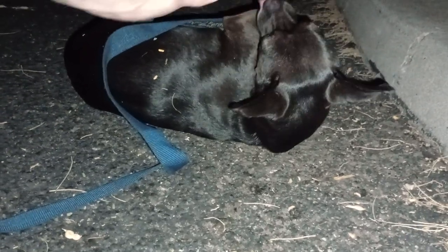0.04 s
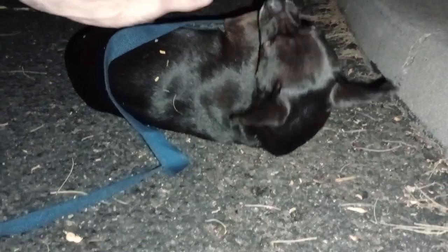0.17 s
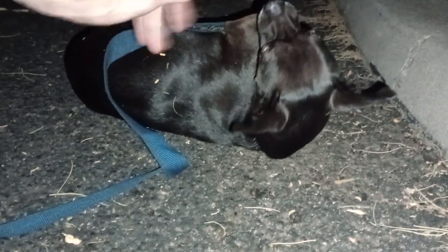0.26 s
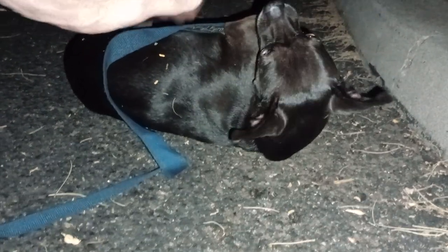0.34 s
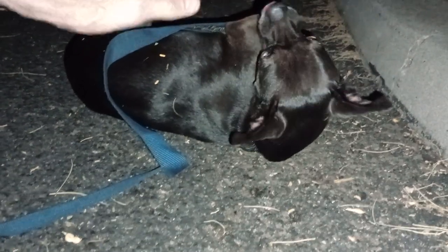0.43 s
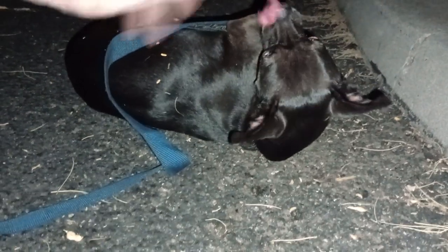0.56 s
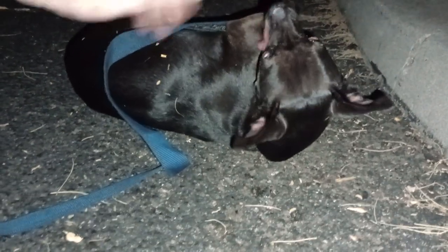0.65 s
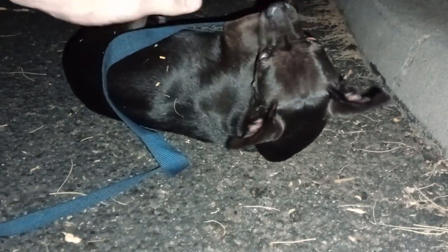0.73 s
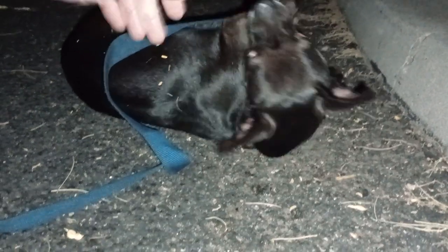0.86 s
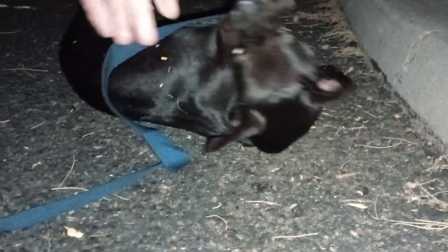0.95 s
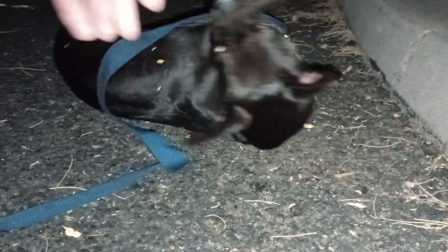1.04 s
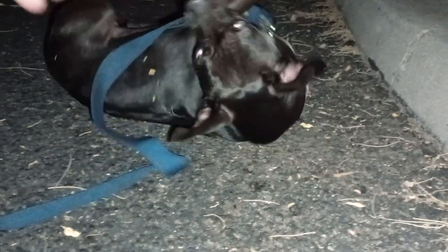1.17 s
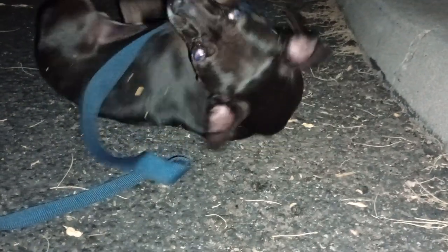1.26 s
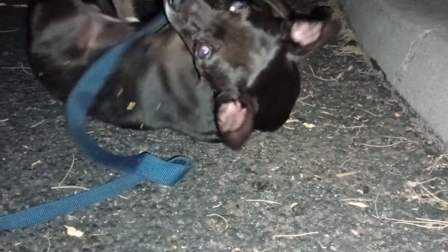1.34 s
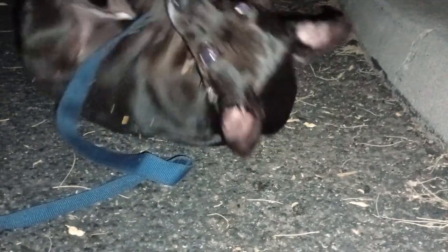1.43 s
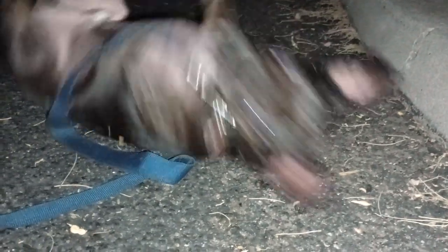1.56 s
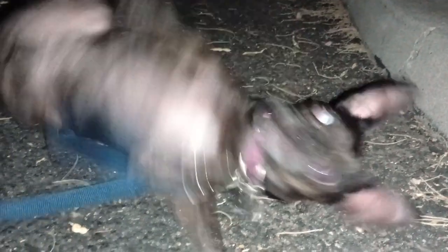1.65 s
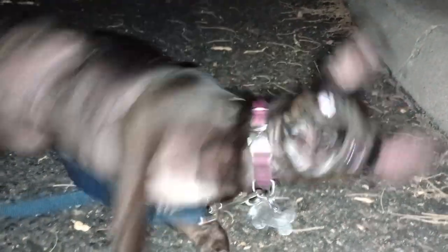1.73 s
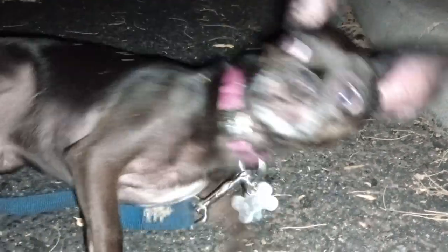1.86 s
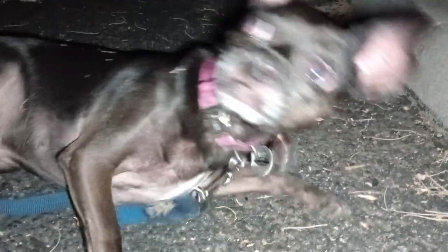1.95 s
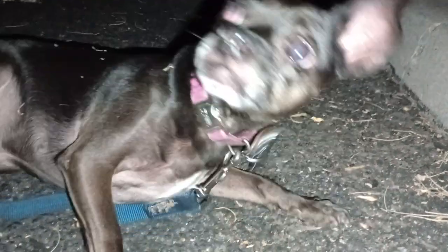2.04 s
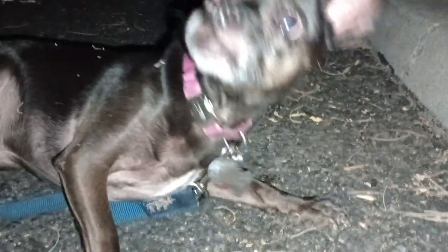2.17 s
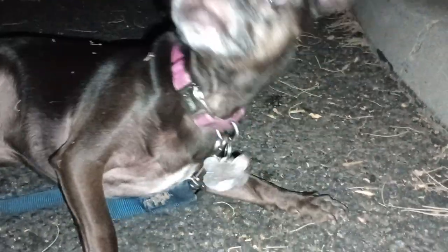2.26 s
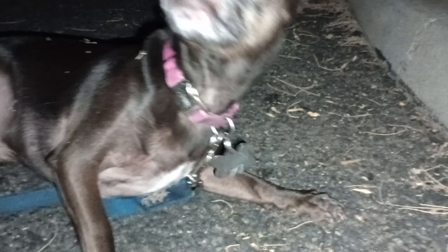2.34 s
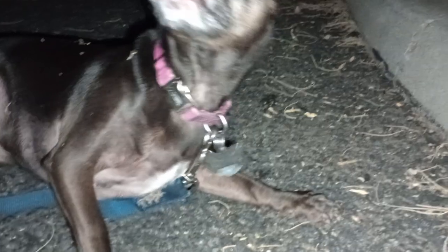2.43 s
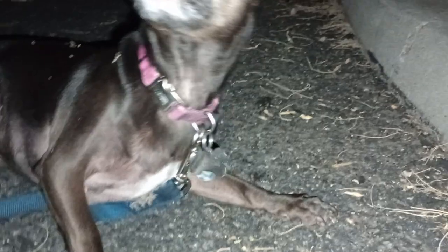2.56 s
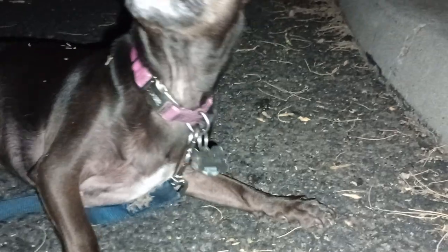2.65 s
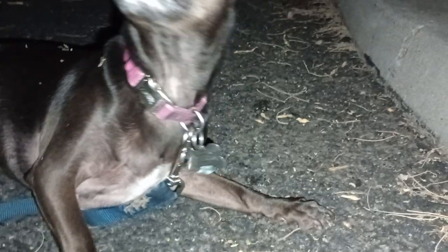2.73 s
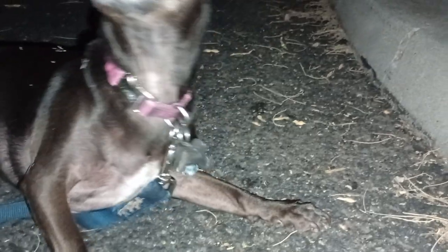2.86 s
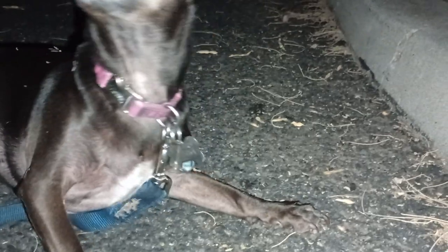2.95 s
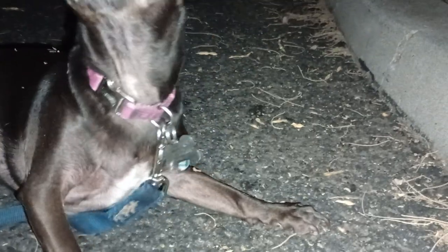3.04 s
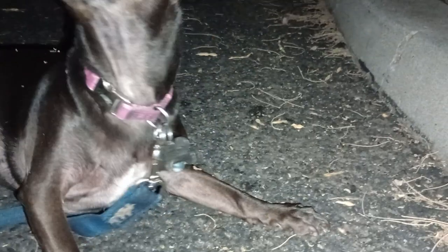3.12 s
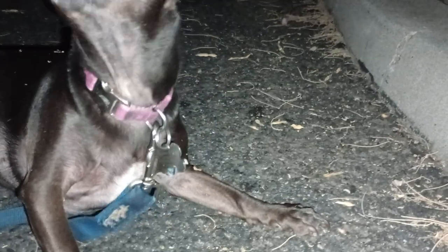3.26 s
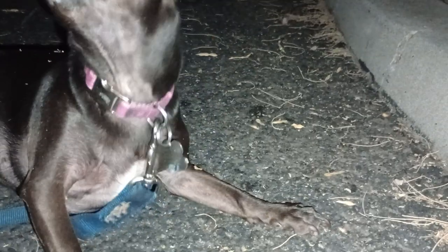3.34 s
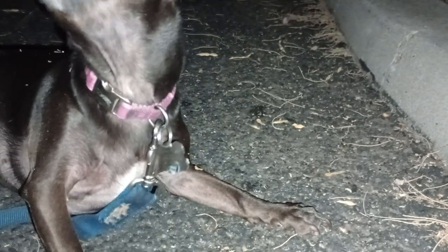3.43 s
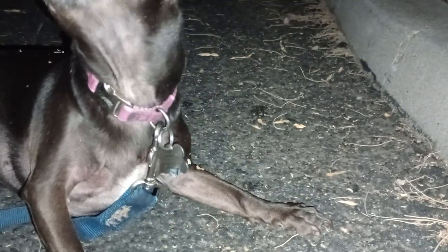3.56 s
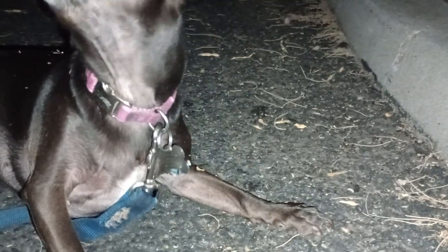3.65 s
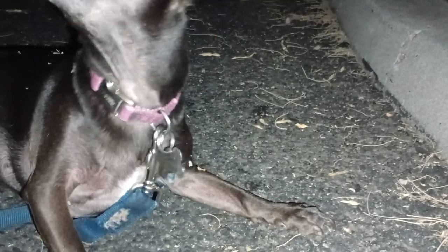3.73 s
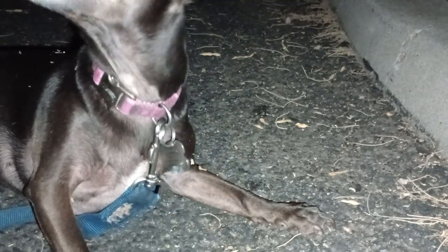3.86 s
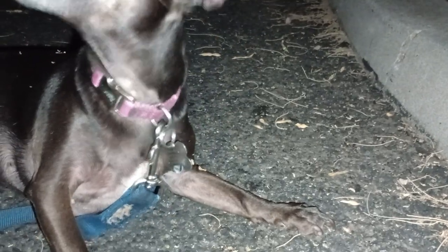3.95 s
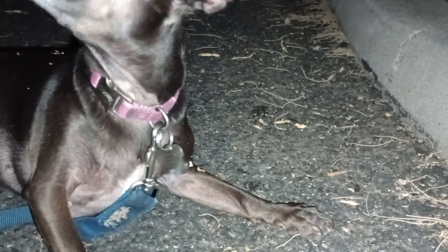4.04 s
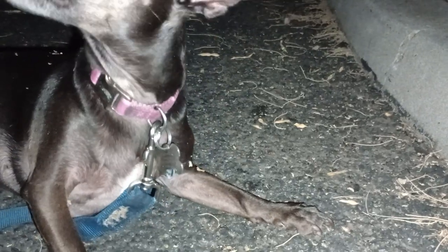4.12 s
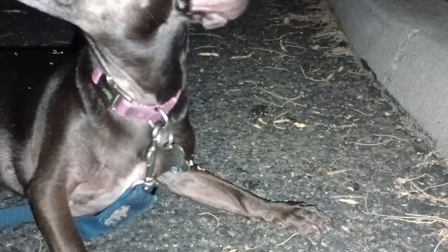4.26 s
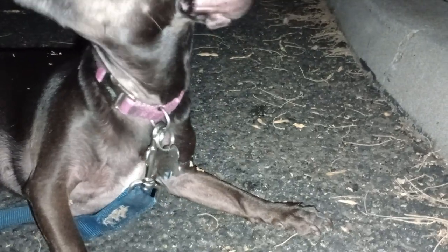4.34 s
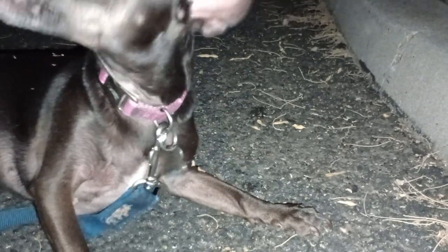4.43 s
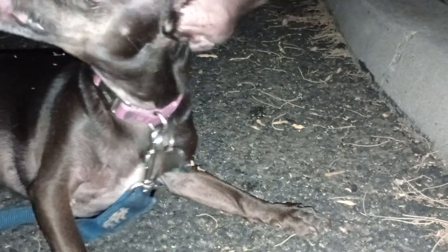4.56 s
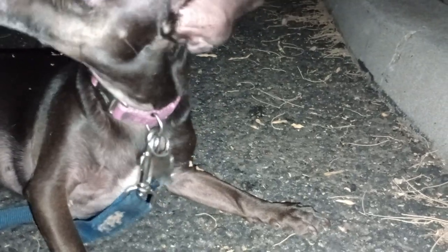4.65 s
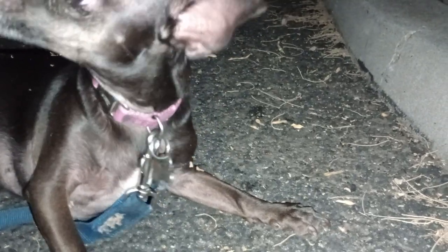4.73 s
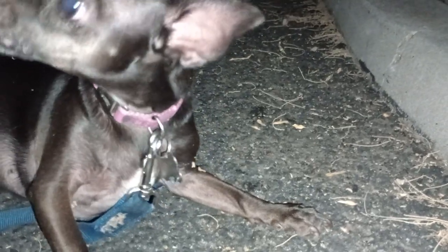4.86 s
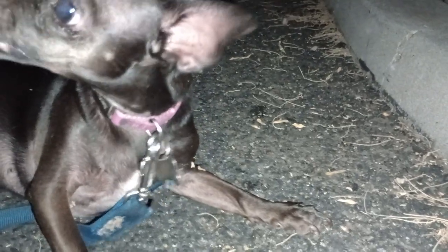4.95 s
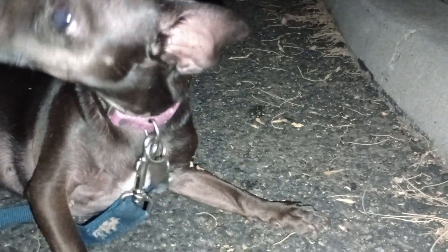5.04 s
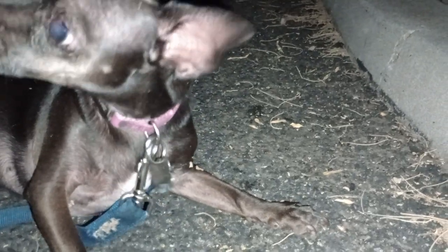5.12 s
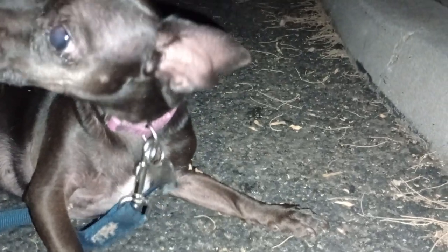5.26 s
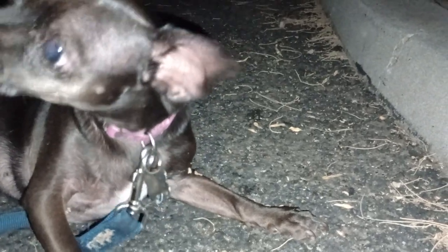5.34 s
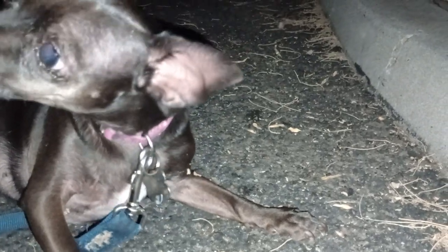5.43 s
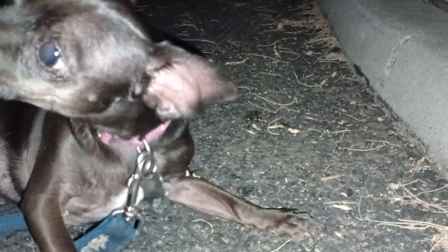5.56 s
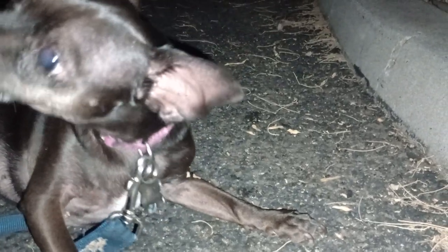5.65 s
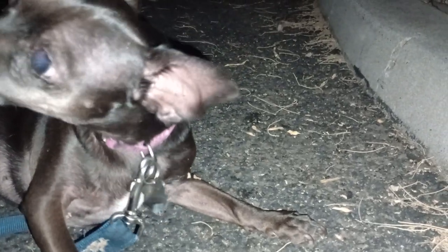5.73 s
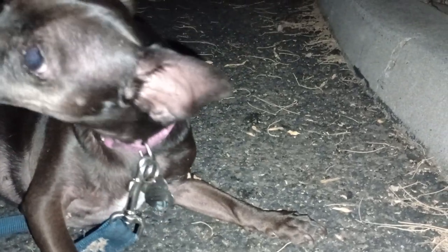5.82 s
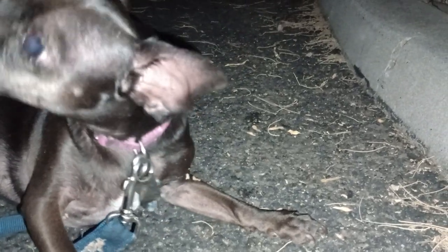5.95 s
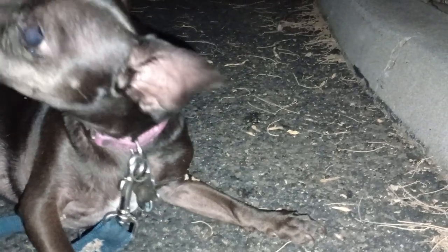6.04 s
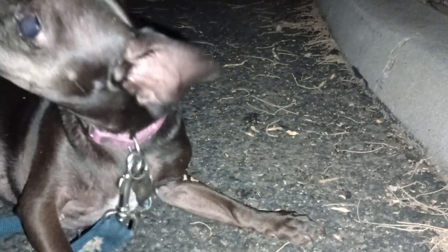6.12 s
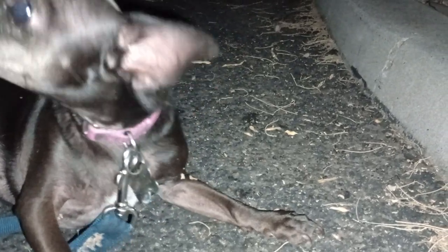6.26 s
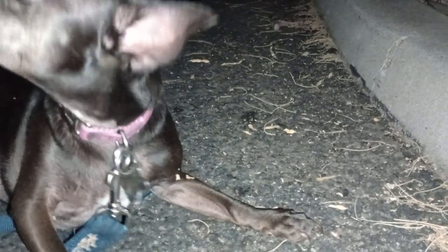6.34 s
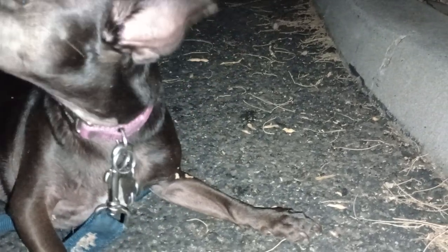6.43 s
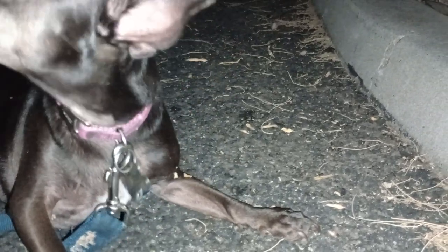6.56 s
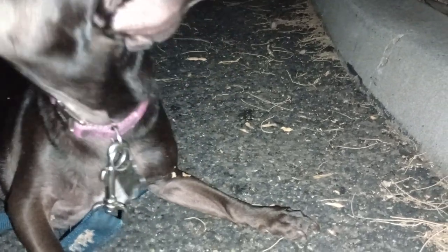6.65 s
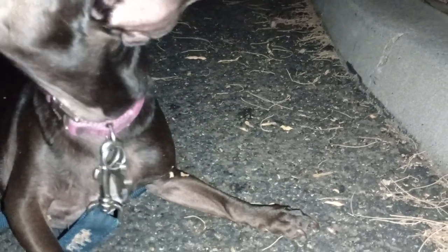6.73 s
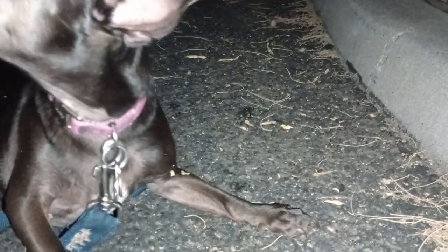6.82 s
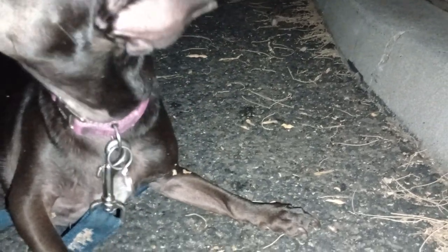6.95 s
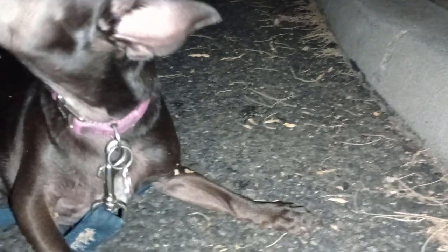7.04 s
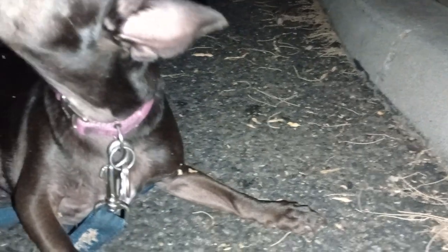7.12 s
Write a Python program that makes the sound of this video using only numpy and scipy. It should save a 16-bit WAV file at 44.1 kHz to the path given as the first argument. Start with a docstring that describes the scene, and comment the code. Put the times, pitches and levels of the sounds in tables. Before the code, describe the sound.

A quiet street at night, heard close up on a phone in stereo. Low distant traffic rumble, soft hiss and a faint wavering hum swell and dip throughout. From 0 to 1.7 s there are only tiny fur and strap rustles and a few faint ticks. At about 1.77 s the dog rolls upright: dull knocks on gritty asphalt and a sudden, loud, bright clatter of collar tags, rings and leash clip. Rapid irregular clashes with very short, high rings are densest until 2.35 s, then thin out by 2.6 s. A faint cricket starts on the right around 2.4 s and continues. A short nasal snort comes at 2.85 s, with a weaker puff just after. Small metallic ticks and strap rubs gather at 3.2 to 3.6 s, then grow sparse. Another little clink and dull knock falls at 6.03 s, followed by faint ticks and rustle to the end near 7.2 s.

```python
"""A small dog's metal tags, rings and leash clip clash in a burst as it rolls upright on gritty asphalt,
close to a phone; fading sine waves make the ringing and short noise bursts make the cracks.
Lone ticks, fur and strap rustle, snorts and dull knocks are shaped noise, with pings in the ticks.
Under it all lie far traffic (filtered noise) and a mains hum (wavering sines), a background whose level
rises and dips; a cricket (pulsed noise) starts up partway."""
import sys
import numpy as np
from scipy import signal
from scipy.fft import rfft, irfft, next_fast_len
from scipy.io import wavfile
from scipy.ndimage import uniform_filter1d

SR = 44100
rng = np.random.default_rng(int(sys.argv[2]) if len(sys.argv) > 2 else 0)


def to_wav(sig):
    """Store sig (one row per channel, or 1-D mono) as 16-bit WAV at the path in sys.argv[1].

    Samples outside -1..1 are clipped; the rate is SR.
    """
    pcm = np.clip(np.atleast_2d(sig), -1, 1) * 32767
    pcm = np.round(pcm).astype(np.int16)
    wavfile.write(sys.argv[1], SR, pcm.T)  # frames by channels


N = 317079
T = np.arange(N) / SR


def undb(db):
    """Turn decibels into a gain."""
    return 10 ** (np.asarray(db) / 20)


def unit(x):
    """Scale a sound to an rms of 1."""
    return x / np.sqrt(np.mean(x ** 2))


def sides(pan_db):
    """Left and right gains that differ by pan_db; positive favours the left."""
    return undb([[pan_db / 2], [-pan_db / 2]])


def shape(x, points):
    """Filter a sound by a curve of (pitch [Hz], gain [dB]) points."""
    hz, db = np.transpose(points)
    size = next_fast_len(N)
    log_hz = np.log(np.fft.rfftfreq(size, 1 / SR) + 1)
    gain = undb(np.interp(log_hz, np.log(hz), db))
    return irfft(rfft(x, size) * gain, size)[:N]


def band(x, lo_hz, hi_hz):
    """Keep mainly the pitches between two limits."""
    edges = [lo_hz, min(hi_hz, .45 * SR)]
    return signal.sosfilt(signal.butter(2, edges, "bandpass", fs=SR, output="sos"), x)


def curves(table, rest_db=-140):
    """Draw each level column of a table over time, at rest_db outside it."""
    s, *columns = np.transpose(table)
    return [np.interp(T, s, c, rest_db, rest_db) for c in columns]


def walk(rate):
    """A smooth random wander with about `rate` new targets a second and a spread near 1."""
    k = int(SR / rate)
    steps = np.repeat(rng.standard_normal(N // k + 1), k)
    return 1.4 * uniform_filter1d(uniform_filter1d(steps, k), k)[:N]


def add(out, s, sound):
    """Mix a sound in at s seconds."""
    i = int(s * SR)
    out[:, i:i + sound.shape[1]] += sound[:, :N - i]


# how alike left and right are in the background: (pitch [Hz], likeness [0 to 1])
LIKENESS = [(60, 0.99), (290, 0.48), (640, 0.15), (1400, 0)]


def pair(points):
    """Noise of a given colour on two sides: alike in the bass, unrelated in the treble."""
    hz, alike = np.transpose(LIKENESS)
    # what both sides share grows with likeness, what sets them apart shrinks
    mid, side = (shape(rng.standard_normal(N), np.transpose([hz, 10 * np.log10(1 + sign * alike)]))
                 for sign in (1, -1))
    return unit(np.array([shape(mid + side, points), shape(mid - side, points)]))


LUMPS_DB, LUMPS_PER_S = 1.5, 9  # spread and pace of each slice's flicker


def lumpy(x, lo_hz, count):
    """Quarter-octave slices from lo_hz upward swell and fade on their own."""
    size = next_fast_len(N)
    spectrum = rfft(x, size)
    place = 4 * np.log2(np.fft.rfftfreq(size, 1 / SR) / lo_hz + 1e-9)
    place = np.clip(place, 0, count - 1)  # the end slices also take everything beyond them
    out = 0
    for k in range(count):
        weight = np.clip(1 - np.abs(place - k), 0, 1)
        out = out + undb(LUMPS_DB * walk(LUMPS_PER_S)) * irfft(spectrum * weight, size)[:, :N]
    return out


# colour of the traffic rumble: (pitch [Hz], relative level [dB per Hz])
RUMBLE_COLOUR = [(12, -63), (20, -38), (80, -8), (114, -1.5), (195, -4), (242, -2), (265, -9), (296, -8),
                 (443, -23), (500, -32.5), (650, -54.5), (1100, -120)]


def rumble(bed_db, throb):
    """Far traffic: deep noise follows the background level, throbs as a whole and flickers in slices."""
    return undb(bed_db + 2 + throb) * unit(lumpy(pair(RUMBLE_COLOUR), 61.1, count=12))


# colour of the background hiss: (pitch [Hz], relative level [dB per Hz])
HISS_COLOUR = [(210, -38.5), (350, -8.5), (464, -11.5), (793, -8.5), (1580, -20), (3480, -31.5),
               (5840, -20), (9210, -35.5), (15000, -47.5)]
HISS_UNDER_DB, HISS_SWELL = -8.5, 1.2  # lies under the background level and swells more steeply
FAR_HISS_DB, FAR_HISS_HZ = -89, 1202  # the part above this pitch is steady


def background_hiss(bed_db, throb):
    """Hiss: its lower part rises and falls with the rumble, its upper part stays steady."""
    mean_db = bed_db.mean()
    level_db = HISS_SWELL * (bed_db - mean_db) + mean_db + HISS_UNDER_DB
    bed = pair(HISS_COLOUR) * sides(0.93)
    low = signal.lfilter(*signal.butter(1, FAR_HISS_HZ, fs=SR), bed)
    return undb(level_db + throb) * lumpy(low, 350, count=9) + undb(FAR_HISS_DB) * (bed - low)


# mains hum tones, before they waver: (pitch [Hz], level [dB])
HUM_TONES = [(119, -78.5), (240, -73.5), (296, -82.5)]


def hum(throb):
    """Mains hum: sine tones wander in pitch and level, and share the background's throb."""
    out = 0
    for hz, db in HUM_TONES:
        gain = undb(db + throb + 2.3 * walk(3.9))
        out = out + gain * np.sin(2 * np.pi * np.cumsum(hz + 4.4 * walk(9.6)) / SR)
    return out


# cricket: (time [s], level [dB])
CRICKET_LEVEL = [(2.3, -110), (2.6, -88), (4.5, -93.5), (7.19, -90)]
CRICKET_HZ, CRICKET_PAN_DB = 4684, -19.5  # far to the right
CRICKET_RATE = 94  # average strokes a second


def cricket():
    """A cricket's fast uneven trill: narrow noise pulses once for each stroke."""
    pace = CRICKET_RATE * (1 + .25 * walk(18))
    strokes = 1.2 + np.sin(np.pi * np.cumsum(pace) / SR) ** 2
    chirp = unit(band(strokes * rng.standard_normal(N), CRICKET_HZ - 85, CRICKET_HZ + 85))
    both = np.array([np.roll(chirp, 5), chirp])  # the left hears it 5 samples later
    return undb(curves(CRICKET_LEVEL)[0]) * both * sides(CRICKET_PAN_DB)


# background over time, followed by rumble and low hiss: (time [s], level before offsets and throb [dB])
BED_LEVEL = [(0, -68), (1.2, -70), (1.62, -69), (1.9, -62), (2.3, -72), (2.4, -64.5), (2.78, -67),
             (2.9, -63), (3.06, -72), (3.3, -64), (3.62, -61), (3.78, -66.5), (4.17, -68), (4.24, -64),
             (4.58, -68), (4.68, -72.5), (4.97, -67.5), (5.22, -71.5), (5.33, -62.5), (5.65, -65),
             (5.75, -68), (6.05, -65.5), (6.6, -72), (6.87, -63), (7.11, -68.5), (7.19, -64.5)]
THROB_DB, THROBS_PER_S = 2.6, 10  # spread and pace of the throb shared by rumble, low hiss and hum


def night():
    """The background: rumble and low hiss rise and fall together, hum throbs with them, a cricket joins."""
    bed_db = np.interp(T, *np.transpose(BED_LEVEL))
    throb = THROB_DB * walk(THROBS_PER_S)
    return rumble(bed_db, throb) + background_hiss(bed_db, throb) + hum(throb) + cricket()


SHARED = 0.1365  # share of a noisy contact's power that reaches both ports alike
PORT_LAG = 13  # samples by which the right port is late


def near(envelope):
    """Noise from close by: the left port hears it first, and each port gets reflections of its own."""
    common, left, right = rng.standard_normal((3, len(envelope))) * envelope
    a, b = np.sqrt(SHARED), np.sqrt(1 - SHARED)
    return np.array([a * common + b * left, np.roll(a * common + b * right, PORT_LAG)])


def grit(rate, spread_db, tail_ms):
    """About `rate` random contacts a second of very uneven size, each with a short noisy tail."""
    hits = (rng.random(N) < rate / SR) * undb(spread_db * np.minimum(rng.exponential(size=N), 3))
    power = signal.lfilter([1], [1, -np.exp(-1000 / (tail_ms * SR))], hits ** 2)
    return near(np.sqrt(power + 1e-9))


# fur and strap, one list before the burst and one after:
# (time [s], bright part level [dB], dull part level [dB])
RUSTLE_LEVELS = [
    [(0.0, -101, -91.5), (0.298, -102, -94.5), (0.74, -94.5, -92), (1.43, -106, -94.5), (1.734, -100, -88),
     (1.772, -70, -61)],
    [(2.62, -100, -93), (2.91, -101, -89), (3.51, -93, -88.5), (3.99, -97.5, -89), (4.39, -96, -87.5),
     (4.57, -98.5, -92.5), (5.33, -94.5, -90), (5.48, -97, -90), (5.75, -97, -92.5), (6.67, -101.5, -93),
     (6.97, -92.5, -90.5), (7.19, -95.5, -86.5)],
]


def rustle():
    """Fur and webbing rub: a crowd of tiny contacts makes a fine grainy noise."""
    x, out = grit(2300, 2.1, 1.5), 0
    bright, dull = unit(band(x, 4500, 10000)), unit(band(x, 1400, 4900))
    for table in RUSTLE_LEVELS:
        db, dull_db = curves(table)
        out = out + undb(db) * bright + undb(dull_db) * dull
    return out


# strokes of strap on fur: (time [s], length [s], level [dB], centre pitch [Hz])
STROKES = [(0.094, 0.034, -88.5, 3500), (0.17, 0.09, -85.5, 4180), (0.745, 0.058, -90.5, 3960),
           (0.507, 0.086, -87.5, 5440), (3.188, 0.054, -79, 5070), (3.29, 0.039, -68, 5150),
           (3.489, 0.14, -76.5, 7300), (3.781, 0.035, -81.5, 8900), (4.329, 0.064, -86.5, 8650),
           (4.91, 0.04, -80, 7830), (5.288, 0.086, -83, 5980), (5.35, 0.087, -86.5, 10600),
           (6.682, 0.054, -81, 5940), (6.814, 0.078, -84, 9900), (7.165, 0.032, -78, 11300)]


def rubs():
    """Short strokes of strap on fur: grainy noise that swells and fades."""
    x, out = grit(1400, 3.5, .9), 0
    for s, length, db, hz in STROKES:
        swell = np.exp(-((T - s - length / 2) / (0.63 * length)) ** 4)
        out = out + undb(db) * swell * unit(band(x, hz / 1.9, hz * 1.22))
    return out


# blows through the nose: (time [s], length [s], level before the nose colours it [dB])
SNORT_BLOWS = [(2.846, 0.041, -56.5), (2.932, 0.049, -72)]
# pitches the nose favours: (pitch [Hz], width [Hz], relative level [dB])
NOSE_BANDS = [(1265, 300, 1), (2430, 380, -4), (4400, 4100, 1), (11300, 5000, -8)]


def snorts():
    """The dog blows through its nose: puffs of noise coloured by a few bands."""
    envelope = 0
    for s, length, db in SNORT_BLOWS:
        rise = np.clip((T - s) / 0.0092, 0, 1)
        fall = np.exp(-np.clip((T - s - length) / 0.021, 0, 50))
        envelope = envelope + undb(db) * rise * fall
    blow = near(envelope)
    # the square root evens out the loudness of narrow and wide bands
    return sum(undb(db) * band(blow, hz - width / 2, hz + width / 2) * np.sqrt(SR / width / 20)
               for hz, width, db in NOSE_BANDS)


# knocks on the ground: (time [s], peak level [dB], pitch [Hz], tail's time to fall 60 dB [s])
GROUND_KNOCKS = [(1.7736, -36.5, 826, 0.012), (1.779, -36, 784, 0.06), (1.7867, -48, 970, 0.063),
                 (1.8117, -50, 970, 0.024), (1.8373, -49.5, 1080, 0.048), (1.864, -49.5, 1600, 0.033),
                 (2.017, -48.5, 980, .023), (6.028, -53, 1290, 0.11), (6.0335, -48, 1280, 0.055)]


def thuds():
    """Dull knocks of leg and buckle on the ground: one blow and a gritty tail."""
    out, t = np.zeros((2, N)), np.arange(4096) / SR
    for s, db, hz, t60 in GROUND_KNOCKS:
        tail = 0.19 * rng.standard_normal(len(t)) * np.exp(-np.log(1000) * t / t60)
        knock = band(np.exp(-(t / 0.00016) ** 2) + tail, hz / 1.515, hz * 1.24)
        add(out, s, np.array([knock, np.roll(knock, 5)]) * undb(db) / np.abs(knock).max())
    return out


FAINT_PER_S, FAINT_DB = 14, 20  # ticks a second, level over the rustle's bright part
FAINT_HZ, FAINT_DULL_DB = 7520, -37  # middle pitch, dull part relative to the click


def faint():
    """Rows for small ticks at random times that rise and fall with the rustle."""
    s = rng.random(int(FAINT_PER_S * N / SR)) * T[-1]
    hz = np.clip(FAINT_HZ * np.exp(0.3 * rng.standard_normal(len(s))), 3000, 15000)
    rustle_db = np.max([curves(table)[0] for table in RUSTLE_LEVELS], axis=0)
    db = np.interp(s, T, rustle_db) + FAINT_DB
    return list(zip(s, db, hz, np.full_like(s, FAINT_DULL_DB)))


# ticks of metal and grit: (time [s], level [dB], centre pitch [Hz], dull part relative level [dB])
TICK_HITS = [(0.123, -58, 7400, -23), (0.506, -68, 6460, -27), (0.5303, -65, 6160, -27),
             (0.5732, -56, 9000, -35), (2.977, -60, 9400, -4.5), (3.216, -58.5, 5130, -18),
             (3.292, -55.5, 5470, -39), (3.3057, -37.5, 8260, -29), (3.314, -44, 14100, -27),
             (3.431, -46.5, 9840, -42), (3.455, -58, 5260, -23), (3.495, -45, 9700, -42),
             (3.5591, -39.5, 7660, -11.5), (3.56, -34.5, 15500, -38), (3.6224, -60.5, 3300, -18),
             (3.7835, -65, 5670, -28.5), (3.9647, -69, 3600, -15.5), (4.11, -69, 3700, -21.5),
             (4.13, -74, 3150, -18), (4.201, -51, 5480, -35), (4.208, -58, 1790, -33.5),
             (4.414, -65, 5680, -24), (4.569, -68.5, 4560, -4), (4.736, -74, 3520, -16),
             (4.8985, -70, 5510, -4), (4.9244, -61, 10500, -31.5), (5.2817, -59, 5670, -36.5),
             (5.3, -70, 7070, -30), (5.347, -75, 8800, -29.5), (5.609, -63.5, 11170, -30),
             (5.617, -68, 10800, 2.5), (6.0194, -44, 8050, 1), (6.0225, -38.5, 14240, -9),
             (6.0249, -40, 10270, 1), (6.0324, -44, 6100, 2.5), (6.049, -64, 9700, -15),
             (6.068, -59.5, 6450, -6.5), (6.68, -81, 12000, -30.5), (6.7003, -62, 5040, -5),
             (6.823, -60, 5400, -20), (6.823, -62, 9500, -30.5), (7.014, -61, 12880, -32),
             (7.0673, -61, 9750, -10), (7.106, -58.5, 4670, -3.5), (7.158, -63.5, 7370, -29)]
# the collar moves: (time [s], left minus right [dB])
COLLAR_PAN = [(0, -5), (3.35, -7), (3.45, -1.5), (3.9, 2.5), (5.3, 23), (6.0, -0.5), (7.0, 12.5)]


def ticks():
    """Short grainy clicks, each a noise burst with its own colour and a brief ping."""
    out, t = np.zeros((2, N)), np.arange(2048) / SR
    for s, db, hz, dull_db in TICK_HITS + faint():
        burst = near((np.exp(-t / .0018) + .06 * np.exp(-t / .008)) * np.minimum(t / .0005, 1))
        body = band(band(burst, hz / 1.35, hz * 1.3), hz / 1.35, hz * 1.3)
        ping = 3.0 * band(burst, hz / 1.03, hz * 1.03)
        click = body + 0.43 * band(burst, 3460, 10400) + ping
        dull = band(band(burst, 1720, 4900), 1720, 4900)
        both = click / np.abs(click).max() + undb(dull_db) * dull / np.abs(dull).max()
        add(out, s, undb(db) * both * sides(np.interp(s, *np.transpose(COLLAR_PAN))))
    return out


# loose metal between the clashes: (time [s], bright part level [dB], dull part level [dB])
CHATTER_LEVELS = [(1.77, -92, -45), (1.83, -84, -56.5), (1.95, -98, -67), (2.05, -72, -75),
                  (2.09, -71.5, -98), (2.18, -53.5, -69.5), (2.33, -58.5, -78.5), (2.4, -70, -85),
                  (2.66, -102, -82)]


def chatter():
    """Small fast contacts of loose metal: broad noise, partly ringing the tags' main modes."""
    db, dull_db = curves(CHATTER_LEVELS)
    x = grit(700, 3.0, 1.0)
    main_modes = TAG_ONE_MODES[:1] + TAG_TWO_MODES[:1] + TAG_THREE_MODES[:4]
    rung = sum(undb(mode_db) * band(x, hz - 45, hz + 45) for hz, mode_db, _ in main_modes)
    bright = unit(band(x, 3900, 14000)) + undb(-7.5) * unit(rung)
    return undb(db) * bright + undb(dull_db) * unit(band(x, 1400, 6900))


SMALL_COUNT, SMALL_DB, SMALL_T60_S = 30, -19.5, 0.0403  # rings a clash, gain, time to fall 60 dB
SMALL_LO_HZ, SMALL_HI_HZ = 2716, 14700


def small_rings(t):
    """Links and edges: brief rings at chance pitches, new at every clash and unlike at the two ports."""
    spot, turn, left, right = rng.random((SMALL_COUNT, 4)).T[:, :, None]
    hz = SMALL_LO_HZ + (SMALL_HI_HZ - SMALL_LO_HZ) * spot
    fade = np.exp(-np.log(1000) * t / SMALL_T60_S) * np.minimum(t / 0.003, 1)
    ring = fade * np.sin(2 * np.pi * (hz * t + turn))
    return undb(SMALL_DB) * np.array([(left ** 2 * ring).sum(0), (right ** 2 * ring).sum(0)])


def crack_noise(t, dull_db):
    """The crack of a clash: a sharp noise burst with a few quick bounces, plus small rings."""
    late, weak = rng.random((3, 2)).T
    burst = (np.exp(-t / .0018) + .05 * np.exp(-t / .009)) * np.minimum(t / .0007, 1)
    bounces = sum(.7 * w * np.roll(burst, int(d * .005 * SR)) for d, w in zip(late, weak))
    noise = near(burst + bounces)
    bright = band(noise, 6500, 14000)
    dull = band(band(noise, 2298, 12000), 880, 7950)
    return bright + small_rings(t) + undb(dull_db) * dull


# clashes: (time [s], crack level [dB], ring level of tag one [dB], of tag two [dB], of tag three [dB])
CLASH_HITS = [(1.685, -65, -91, -93, -102), (1.698, -56.5, -76, -91, -95), (1.722, -61, -82, -98, -99),
              (1.7741, -22, -36.5, -38, -44), (1.7867, -19, -43, -28, -46), (1.794, -26, -54, -75, -67),
              (1.811, -33, -59, -64, -63), (1.827, -51, -52, -73, -64), (1.836, -36, -53, -39, -36),
              (1.8473, -22.5, -52.5, -35, -40), (1.8559, -20, -36.5, -45.5, -50),
              (1.8643, -24.5, -44, -37, -56), (1.889, -26.5, -68, -42, -44), (1.918, -40.5, -81, -53, -76),
              (1.9307, -56, -75, -87, -44), (1.9453, -34, -71, -91, -46), (1.951, -22.5, -54, -57, -68),
              (1.9588, -18, -42, -34.5, -32), (1.969, -40, -38, -33, -34), (1.979, -34, -39, -51.5, -61),
              (1.9965, -25.5, -50, -41, -57), (2.0037, -29, -34, -68, -36), (2.011, -14, -48, -51, -29),
              (2.0167, -22, -22.5, -37, -34), (2.021, -20.5, -29, -61, -20), (2.029, -28, -32.5, -27, -43),
              (2.042, -30.5, -34, -58, -51), (2.055, -60, -49, -49, -66),
              (2.111, -34.5, -50.5, -44.5, -56.5), (2.1169, -33, -53.5, -39.5, -40),
              (2.137, -28.5, -39.5, -41.5, -35.5), (2.144, -48.5, -37, -68.5, -52.5),
              (2.172, -41.5, -63.5, -74, -56.5), (2.185, -35, -71, -61, -61),
              (2.192, -33.5, -53, -47.5, -52), (2.2075, -29.5, -40, -39, -37.5),
              (2.2205, -23, -26.5, -16, -47.5), (2.229, -22.5, -36, -19.5, -56.5),
              (2.241, -44.5, -39, -57.5, -66), (2.2517, -17.5, -41.5, -47, -40),
              (2.2615, -25.5, -56.5, -59, -31.5), (2.2741, -34.5, -38.5, -29, -31),
              (2.285, -27, -36.5, -53, -35.5), (2.297, -29.5, -42, -57, -36),
              (2.3109, -52, -51, -40.5, -43), (2.325, -64, -78.5, -51, -72), (2.3364, -36, -36, -17, -60),
              (2.351, -36.5, -40.5, -53, -86), (2.4005, -61, -72, -61, -66), (2.4074, -40, -45, -46, -67),
              (2.422, -48, -77, -70, -88), (2.4505, -33.5, -71, -70, -76), (2.5007, -44.5, -71, -39.5, -67),
              (2.507, -36.5, -80, -44.5, -75), (2.579, -39.5, -57, -51.5, -74), (2.595, -41, -60, -59, -70),
              (2.613, -52, -91.5, -94, -99.5)]
# ways each metal part rings: (pitch [Hz], relative level [dB], time to fall 60 dB [s])
TAG_ONE_MODES = [(8615, 0, .2), (14280, -19, .12), (8940, -18, .05)]
TAG_TWO_MODES = [(9866, 0, .16), (12720, -22, .12), (10116, -18, .05)]
TAG_THREE_MODES = [(11765, 0, .11), (15720, -7, .08), (6577, -9, .09), (7610, -10, .14), (3140, -18, .08),
                   (11908, -3, .07)]
# split rings and leash clip, whose loudness follows the crack, same columns:
# (pitch [Hz], relative level [dB], time to fall 60 dB [s])
SPLIT_RING_MODES = [(11060, -11, .025), (11380, -13, .025), (12115, -10, .03), (12300, -9, .03),
                    (10500, -14, .02)]
CLIP_MODES = [(6297, -19, 0.027), (5640, -26, .04), (7460, -25, 0.022)]
RING_LEFT = .15  # share of the earlier ring that survives the next touch
# once the tags leave the ground the crack loses its dull part
LIFTS_S, DULL_DB, DULL_DB_PER_S = 2.2, -14.5, -24.5


def clashes():
    """Metal parts clash: each hit cracks and sets them ringing, and the next touch chokes the ring."""
    out, t = np.zeros((2, N)), np.arange(6000) / SR
    parts = (TAG_ONE_MODES, TAG_TWO_MODES, TAG_THREE_MODES, SPLIT_RING_MODES + CLIP_MODES)
    mode_hz, mode_db, mode_t60 = np.concatenate(parts).T
    part = np.repeat(np.arange(len(parts)), [len(p) for p in parts])
    gaps = np.append(np.diff(np.array(CLASH_HITS)[:, 0]), 1)
    for (s, crack_db, *tag_db), gap in zip(CLASH_HITS, gaps):
        scatter, detune, turn, side, facing = rng.standard_normal((len(mode_hz), 5)).T
        # a mode at 0 dB keeps its level; the weaker ones vary from hit to hit
        size = undb(np.append(tag_db, crack_db)[part] + mode_db + 4 * scatter * (mode_db < 0))
        hz = mode_hz * (1 + np.where(part < 3, .001, .008) * detune)
        pole = -np.log(1000) / mode_t60 + 2j * np.pi * hz  # fading and turning in one number
        # each mode's clock runs on from clash to clash, give or take a random turn
        phase = 2 * np.pi * mode_hz * int(s * SR) / SR + .7 * turn
        ring = size[:, None] * np.exp(pole[:, None] * t + 1j * phase[:, None])
        choke = RING_LEFT + (1 - RING_LEFT) / (1 + np.exp((t - gap - .001) / 0.00069))
        choke = choke * np.minimum(t / .0016, 1)
        # swinging flat tags beam each mode differently to the two ports, in strength and in phase
        beam = undb(2.5 * side)
        rings = np.array([beam @ ring, (np.exp(2j * facing) / beam) @ ring]).imag
        crack = undb(crack_db) * crack_noise(t, DULL_DB + DULL_DB_PER_S * max(s - LIFTS_S, 0))
        add(out, s, crack + choke * rings)
    return out


# the phone's body shades one port: (pitch [Hz], left minus right [dB])
PORT_SHADE = [(500, 6), (2000, -1.5), (4000, -0.5), (8000, 2.5), (15000, 10.5)]


def scene():
    """The dog, shaded by the phone, over the night."""
    left, right = clashes() + chatter() + ticks() + rustle() + snorts() + rubs() + thuds()
    hz, db = np.transpose(PORT_SHADE)
    dog = np.array([shape(left, np.transpose([hz, db / 2])), shape(right, np.transpose([hz, -db / 2]))])
    return dog + night()


SELF_NOISE_DB, TOP_HZ = -110, 16000


def record(dry):
    """Add a faint steady hiss and remove everything above TOP_HZ."""
    hiss = undb(SELF_NOISE_DB) * rng.standard_normal(dry.shape)
    return signal.sosfilt(signal.ellip(10, .2, 60, TOP_HZ, fs=SR, output="sos"), dry + hiss)


dry = scene()
out = record(dry)
to_wav(out)
```